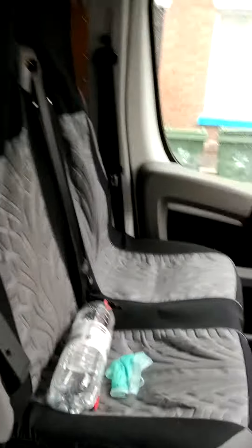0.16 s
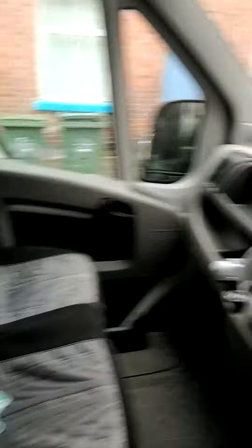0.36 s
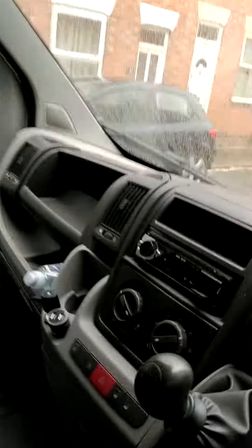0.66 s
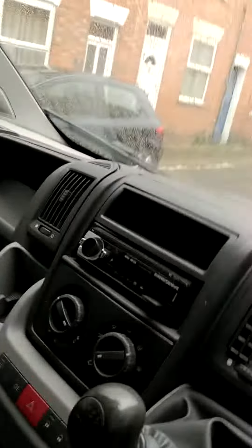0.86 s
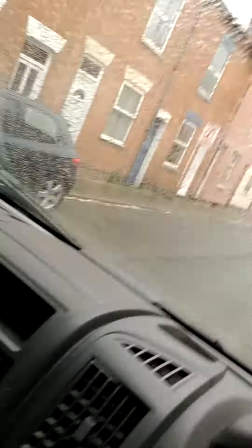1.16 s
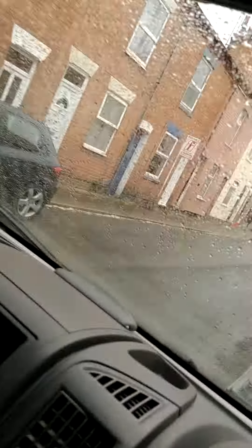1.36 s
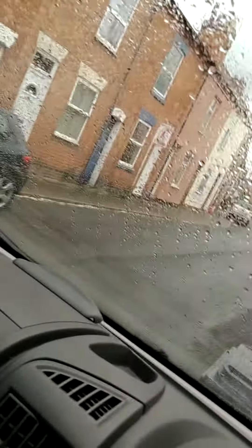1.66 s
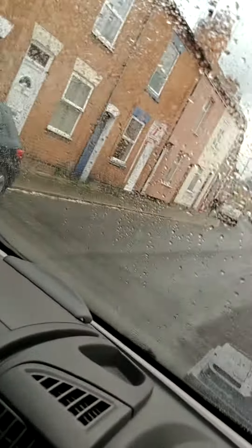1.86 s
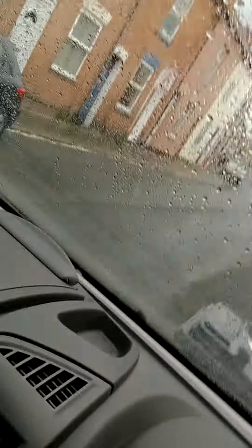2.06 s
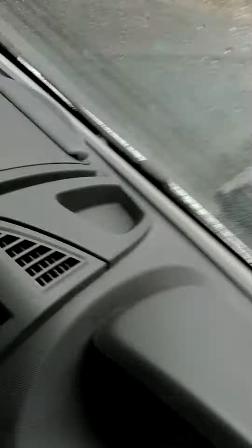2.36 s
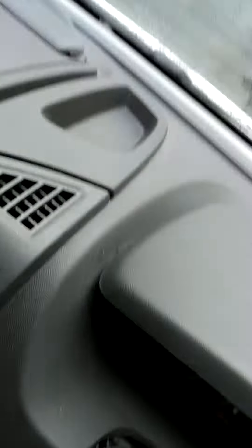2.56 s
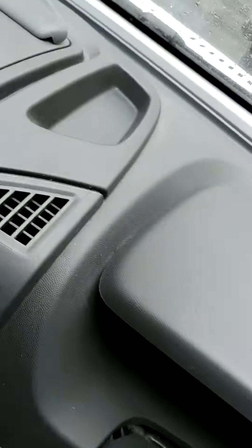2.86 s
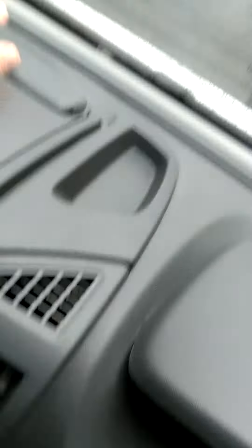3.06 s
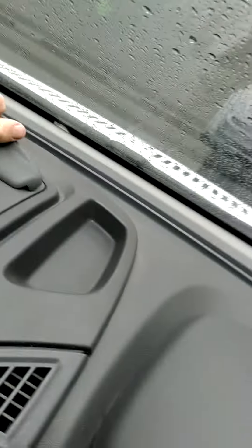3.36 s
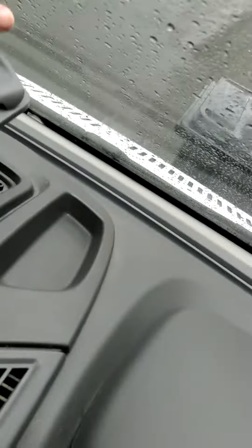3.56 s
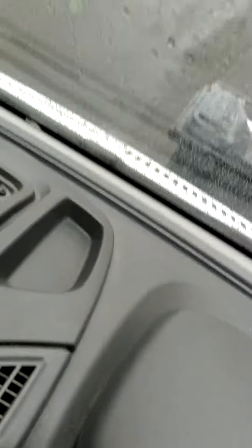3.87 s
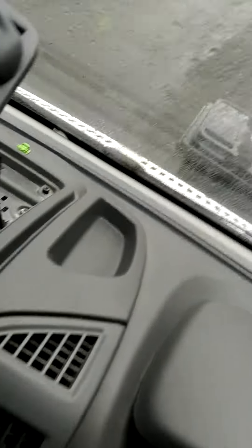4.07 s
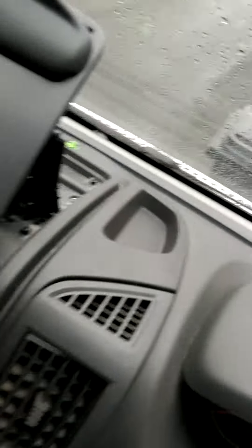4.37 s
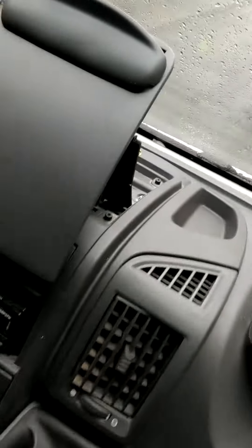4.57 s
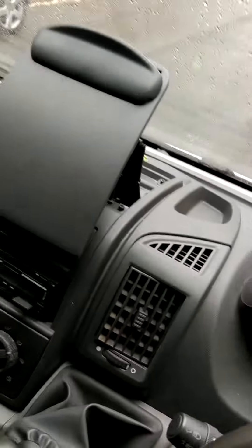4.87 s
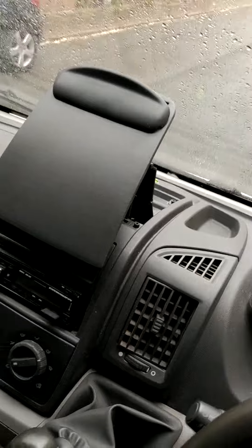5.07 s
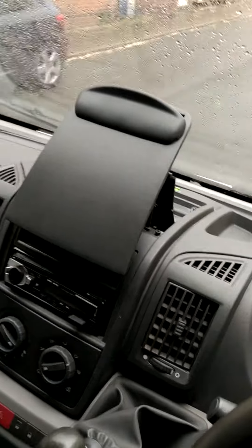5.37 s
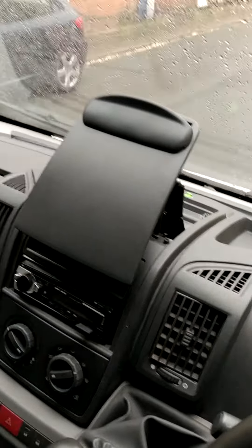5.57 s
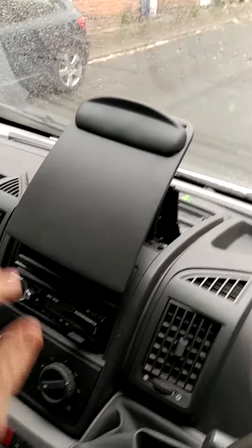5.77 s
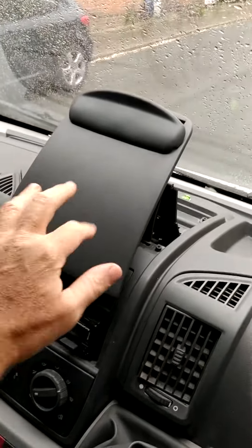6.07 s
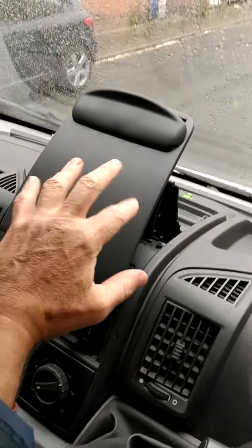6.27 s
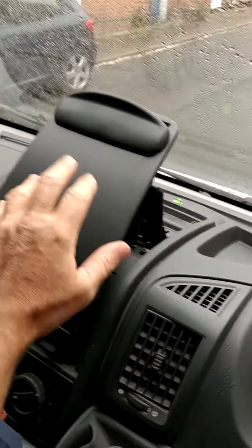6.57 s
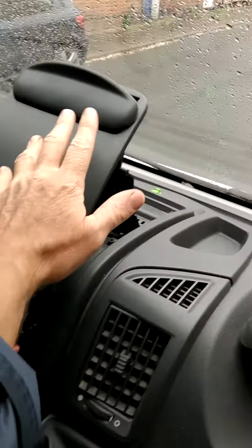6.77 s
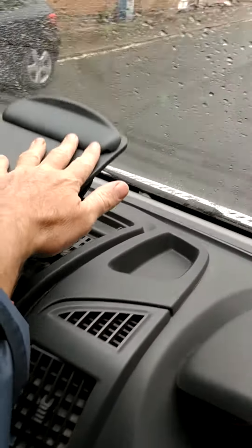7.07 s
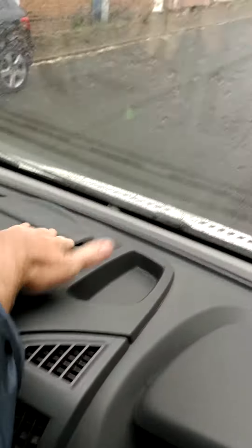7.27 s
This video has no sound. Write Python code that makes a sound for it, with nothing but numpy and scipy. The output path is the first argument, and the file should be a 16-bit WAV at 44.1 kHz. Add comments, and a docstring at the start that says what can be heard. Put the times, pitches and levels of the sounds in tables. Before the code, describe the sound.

Close, dry stereo inside a parked van, with very faint street rumble, hum and hiss. From the start a jacket swishes and rubs in uneven strokes, mostly left of centre, and the phone case makes tiny sharp ticks at one side or the other. At 0.8 s keys clash brightly with a soft thump, then clink lightly at 1.2 s. A faint rising squeak chirps near 1.9 s, a sharp tick follows at 2.0 s, and a dull dash thud lands at 2.55 s. From 2.8 s plastic scrapes; between 3.2 and 4.0 s a clipboard unlatches in a busy rattle of clacks and low knocks, strongest near 3.57 and 3.91 s. It calms to cloth rustle, with light finger taps around 5.8-6.0 s. Small clacks come at 6.9-7.0 s, a strong swish on the left at 7.25 s, then a loud booming plastic slap at 7.37 s.

```python
"""Clipboard and keys in a parked van.

Someone in a rustling jacket moves across the cab (shaped noise and small pats); keys clink (noise, modes).
A plastic clipboard is unlatched from the dashboard, swung up and slapped shut again (resonant noise bursts);
the dash booms under the blows (decaying sines and noise). Light taps, scrapes and a squeak go with it.
The hand-held phone ticks in the grip (short pulses), over faint hiss, hum and street rumble."""
import sys
import numpy as np
from scipy import signal
from scipy.fft import irfft
from scipy.io import wavfile
from scipy.ndimage import map_coordinates

SR = 44100
rng = np.random.default_rng(int(sys.argv[2]) if len(sys.argv) > 2 else 0)


def transcribe(signal):
    """Save signal, clipped to [-1, 1], as a 16-bit WAV file at the path in sys.argv[1]."""
    frames = np.atleast_2d(signal).T
    limited = np.clip(frames, -1, 1)
    pcm = np.round(limited * 32767).astype(np.int16)
    wavfile.write(sys.argv[1], SR, pcm)


N = 327222
TIME = np.arange(N) / SR
AGE = np.arange(SR // 3) / SR  # seconds since the start of one hit
LEFT_RIGHT = np.array([[1], [-1]])


def undb(db):
    """Decibels to gain."""
    return 10 ** (np.asarray(db) / 20)


def unit(x):
    """Scale to rms 1."""
    return x / np.sqrt(np.mean(x ** 2))


def fade(t60_s):
    """Exponential decay over the life of one hit, 60 dB in t60_s."""
    return np.exp(-np.log(1000) * AGE / max(t60_s, 1 / SR))


def sides(pan_db):
    """Left and right gains of equal total power; pan_db is left minus right."""
    return unit(undb(LEFT_RIGHT * pan_db / 2))


def add(out, start_s, sound):
    """Mix a sound in at start_s."""
    end = out.shape[1]
    i = int(np.clip(start_s * SR, 0, end - 1))
    out[:, i:i + sound.shape[1]] += sound[:, :end - i]


def shape(points, f):
    """Gain of a (Hz, dB) spectrum, interpolated over log frequency."""
    hz, db = np.transpose(points)
    return undb(np.interp(np.log(f + 1), np.log(hz), db))


def peaks(table, f):
    """Gain of resonances (Hz, width Hz, dB), added in power."""
    power = sum(undb(db) ** 2 / (1 + (2 * (f - hz) / width_hz) ** 2) for hz, width_hz, db in table)
    return np.sqrt(power)


def cab_noise(gain, size, alike_hz=560, lead_ms=0, direct=0):
    """Noise of colour gain(f) at two ports: long waves alike, short ones unrelated but for a direct share."""
    f = np.fft.rfftfreq(size, 1 / SR)
    mid, side = np.exp(2j * np.pi * rng.random((2, len(f))))
    alike = .95 / (1 + (f / alike_hz) ** 2)
    # the direct share reaches the left port first by lead_ms
    lead = np.exp(2j * np.pi * f * lead_ms / 1000)
    alike = alike + np.clip(direct, 0, 1) * (1 - alike) * lead
    mid = mid * np.sqrt(1 + abs(alike))
    side = side * np.sqrt(1 - abs(alike))
    both = (mid + LEFT_RIGHT * side) * np.exp(.5j * LEFT_RIGHT * np.angle(alike))
    return unit(irfft(gain(f) * both, size))


def flicker(rate_hz, size):
    """Random wander: normal draws at rate_hz joined by straight lines."""
    knots = np.arange(size) * rate_hz / SR
    return np.interp(knots, np.arange(size), rng.standard_normal(size))


def strike(t60_s, rise_s, cab_db, cab_t60_s):
    """Envelope of a blow: contact builds, the part rings, the upholstered cab holds a tail."""
    contact = 1 - np.exp(-(AGE / rise_s) ** 2)
    envelope = contact * np.hypot(fade(t60_s), undb(cab_db) * fade(cab_t60_s))
    return envelope / envelope.max()


def ripple(f, echo=0.19):
    """Windscreen and dash are close by: their echoes give each blow its own peaks and notches."""
    delays_s = rng.uniform(.0005, .004, (3, 2, 1))
    echoes = np.exp(-2j * np.pi * f * delays_s).sum(axis=0)
    return 1 + echo * f / (f + 1500) * echoes


def chatter(depth_db):
    """Uneven gain of loose parts that bounce and touch again; a slower wander joins after first contact."""
    fast = flicker(900, len(AGE))
    slow = flicker(220, len(AGE)) * AGE / (AGE + .012)
    return undb(depth_db * (fast + slow))


# Street noise spectrum. Each row: frequency in Hz, relative level in dB.
STREET_SPECTRUM = [(20, -7.5), (33, -34), (46, 6.5), (65, -8), (160, -11.5), (500, -15), (1500, -30),
                   (4500, -35), (8000, -20.5), (12000, -33)]
# Steady hum. Each row: frequency in Hz, mean rms level in dB.
HUM_TONES = [(47.7, -65.5), (168, -74), (481, -75.5)]
STREET_DB = -62


def street(swell_db=1):
    """Rumble, a low hum and faint hiss come through the closed cab: shaped noise and wavering sines."""
    hum = 0
    for hz, db in HUM_TONES:
        level = np.sqrt(2) * undb(db + 2 * flicker(1.97, N))
        hum = hum + level * np.sin(2 * np.pi * hz * TIME + 0.38 * flicker(7.7, N))
    noise = cab_noise(lambda f: shape(STREET_SPECTRUM, f), size=N)
    return hum + noise * undb(STREET_DB + swell_db * flicker(3.57, N))


STROKE_ATTACK_S, STROKE_REF_DB = 0.06, -37  # a stroke at the reference level takes this attack
STROKE_LAZINESS = 0.51  # fainter strokes gather speed more slowly
STROKE_RELEASE_DB_PER_S = 152
SETTLE_DB, SETTLE_DB_PER_S = -11, 54  # after a stroke the cloth keeps settling, faintly


def stroke(start_s, length_s, swish_db):
    """Gain of one movement: the cloth speeds up, slides, stops and settles."""
    age = TIME - start_s
    after = np.maximum(age - length_s, 0)
    attack_s = STROKE_ATTACK_S * undb(STROKE_LAZINESS * (STROKE_REF_DB - swish_db))
    attack = np.sin(np.pi / 2 * np.clip(age / attack_s, 0, 1)) ** 2
    release = undb(-STROKE_RELEASE_DB_PER_S * after)
    settling = undb(SETTLE_DB - SETTLE_DB_PER_S * after)
    return attack * np.maximum(release, settling)


# Strokes of arm and body in the jacket.
# Each row: start in seconds, length in seconds, relative swish in dB, relative dull rubbing in dB.
JACKET_STROKES = [(-.15, 0.27, -59.5, -54.5), (0.106, 0.38, -44.5, -55), (0.456, 0.28, -54, -55.5),
                  (0.727, 0.039, -37.5, -40), (0.825, 0.22, -47.5, -54.5), (0.986, 0.27, -41, -50.5),
                  (1.414, 0.38, -51.5, -58.5), (1.768, 0.23, -41, -52.5), (1.957, 0.45, -46.5, -50.5),
                  (2.402, 0.066, -47, -50.5), (2.606, 0.18, -45.5, -52), (2.794, 0.15, -43.5, -48),
                  (2.911, 0.34, -39.5, -46.5), (3.173, 0.24, -43.5, -40), (3.495, 0.14, -40.5, -42.5),
                  (3.598, 0.47, -50.5, -51), (4.052, 0.49, -44.5, -54), (4.395, 0.31, -43, -56.5),
                  (4.674, 0.3, -49.5, -58), (4.956, 1.02, -58, -58.5), (5.326, 0.24, -44.5, -55),
                  (5.487, 0.31, -50, -51), (5.765, 0.21, -41.5, -49.5), (6.553, 0.62, -55, -60),
                  (6.886, 0.094, -40, -43), (7.058, 0.37, -42, -49), (7.234, 0.25, -32.5, -44.5)]
RESTING_SWISH_DB, RESTING_RUB_DB = -68, -68  # cloth never lies quite still


def movement():
    """Gains of swish and rubbing: overlapping strokes add in power."""
    swish, rub = undb(RESTING_SWISH_DB) ** 2, undb(RESTING_RUB_DB) ** 2
    for start_s, length_s, swish_db, rub_db in JACKET_STROKES:
        power = stroke(start_s, length_s, swish_db) ** 2
        swish = swish + power * undb(swish_db) ** 2
        rub = rub + power * undb(rub_db) ** 2
    return np.sqrt(swish), np.sqrt(rub)


# Swish spectrum at the reference pitch. Each row: frequency in Hz, relative density in dB per Hz.
SWISH_SPECTRUM = [(1500, -16), (2500, -12), (4200, -11.5), (5600, -8.5), (7000, -2), (8200, 4),
                  (10000, -3.5), (12000, -8)]
# Centre of the swish over time. Each row: time in seconds, pitch in Hz.
SWISH_CENTRE = [(.13, 5920), (.21, 7390), (.47, 7530), (1.1, 8390), (5.2, 7960), (5.37, 7070), (5.5, 8000)]
SWISH_REF_HZ = 8200


def sliding_cloth():
    """The swish drifts in pitch over time: noise read at a varying rate."""
    weave = cab_noise(lambda f: shape(SWISH_SPECTRUM, f), size=N, lead_ms=.43, direct=0.34)
    rate = np.interp(TIME, *np.transpose(SWISH_CENTRE)) / SWISH_REF_HZ
    place = np.cumsum(rate)
    return np.array([map_coordinates(port, [place], mode="mirror") for port in weave])


def wandering_echoes(x, echo=0.92):
    """A moving arm changes its distance to the glass and the dash, so their short echoes slide about."""
    out = x.copy()
    index = np.arange(N)
    for channel in (0, 1):
        for delay_s in (.0014, .0027, .0041):
            delay = SR * delay_s * (1 + .07 * flicker(4, N))
            out[channel] += echo * np.interp(np.round(index - delay), index, x[channel])
    return unit(out)


def buckling_folds(folds_per_s):
    """Folds buckle in small pats: short sines of random pitch, size and phase offset on the right."""
    pats = np.zeros((2, N))
    for start, size, octave, turn in rng.random((int(folds_per_s * N / SR), 4)):
        # each pat rings for about four cycles, between 180 Hz and 1.3 kHz
        cycles = 180 * 7 ** octave * AGE[:SR // 30]
        phase = cycles + np.array([[0], [turn * octave]])
        pat = np.sin(2 * np.pi * phase) * cycles * np.exp(-cycles)
        add(pats, start * N / SR, size * np.sqrt(cycles[-1]) * pat)
    return unit(pats)


# Rubbing spectrum. Each row: frequency in Hz, relative level in dB.
RUB_SPECTRUM = [(30, -38), (80, 0.5), (170, 2), (300, 2.5), (550, -2.5), (1100, -1.5), (2000, -3.5),
                (3500, -7.5), (6000, -14)]
# Where the sleeve is; it ends close to the left port.
# Each row: time in seconds, left minus right in dB (the rubbing takes half).
SLEEVE_SIDE = [(0, 5), (2.3, 3.5), (2.9, 7), (3.45, 0.5), (4.5, 5), (6.9, 6), (7.3, 16)]


def jacket(swish_gain_db=1.5, rub_gain_db=-1.0, grain_db=1.45, crumple_db=2, folds_per_s=170, fold_db=-6):
    """Cloth slides on cloth with a fine-grained swish; its folds rub lower and buckle in small pats."""
    swishing, rubbing = movement()
    grain = undb(swish_gain_db + grain_db * flicker(300, N))
    swish = wandering_echoes(sliding_cloth()) * swishing * grain
    slide = cab_noise(lambda f: shape(RUB_SPECTRUM, f), size=N) * undb(crumple_db * flicker(70, N))
    folds = undb(fold_db) * buckling_folds(folds_per_s)
    rub = (slide + folds) * rubbing * undb(rub_gain_db)
    pan_db = np.interp(TIME, *np.transpose(SLEEVE_SIDE))
    pan = undb(LEFT_RIGHT * pan_db / 2)
    pan = pan / np.sqrt(np.mean(pan ** 2, axis=0))
    return swish * pan + rub * np.sqrt(pan)


# Snaps of the phone case in the grip.
# Each row: time in seconds, relative peak in dB, pitch in Hz, left minus right in dB.
CASE_TICKS = [(0.1725, -11, 960, 39), (0.2517, -14, 6640, -37), (.678, -24, 1800, 27),
              (1.1015, -7.5, 5540, 33), (1.9776, -1, 6200, 34), (3.3275, -11, 7040, 14),
              (3.5064, -5.5, 3450, 30), (4.284, -17, 7100, 15)]


def grip(shell_db=-20):
    """The case snaps beside one port: a single push and pull, a brief shell buzz, no room sound."""
    out = np.zeros((2, N))
    lead_s = 64 / SR  # room for the first half of the pulse
    for start_s, db, hz, pan_db in CASE_TICKS:
        u = 2 * np.pi * hz * (AGE - lead_s)
        snap = u * np.exp((1 - u ** 2) / 2)
        buzz = np.sin(u * 2 / 3) * (u > 0) * fade(0.0027)
        gains = sides(pan_db) / sides(pan_db).max()
        add(out, start_s - lead_s, (snap + undb(shell_db) * buzz) * undb(db) * gains)
    return out


# Keys that swing free. Each row: frequency in Hz before detuning, mean relative level in dB.
FREE_KEY_MODES = [(4870, 0), (5080, -6.5), (5450, -8), (5700, -9), (6550, -2.5), (6900, -10), (7590, -4),
                  (8600, -5), (10230, -13), (11600, -24)]
KEY_T60_S = 0.075


def key_ring(scatter_db=4, detune=0.0087):
    """Decaying sines of free keys; every touch favours other modes, and each port hears them differently."""
    ring = 0
    for hz, db in FREE_KEY_MODES:
        hz = hz * (1 + detune * rng.standard_normal())
        level = undb(db + scatter_db * rng.standard_normal((2, 1)))
        ring = ring + level * np.sin(2 * np.pi * hz * AGE + np.pi * rng.random((2, 1)))
    return ring * fade(KEY_T60_S) * chatter(2) * np.minimum(AGE / .001, 1) / 2


# Hard plastic contact spectrum. Each row: frequency in Hz, relative level in dB.
PLASTIC_SPECTRUM = [(150, -12), (500, -3), (1000, -3), (2000, -2), (3500, -1), (5000, -1), (6000, -4),
                    (8500, 1), (9500, 0), (10500, -4.5), (12000, -7)]


def plastic_contact(f):
    """Colour of a hard contact, shared by key clicks and clipboard clacks."""
    return shape(PLASTIC_SPECTRUM, f)


# Keys touching. Each row: time in seconds, relative level in dB, left minus right in dB,
# clash t60 in seconds, free ring in dB relative to the clash gain.
KEY_CLINKS = [(0.749, -25, 2, 0.027, 1), (0.771, -35, 4, 0.04, 0), (.796, -16, 2, 0.034, -7),
              (0.8007, 1, 0.5, 0.024, -13), (0.8377, -27, 6, 0.017, -1), (0.8752, -30.5, 8, 0.016, 3.5),
              (1.214, -14.5, 5, 0.02, -4), (1.224, -23, 2, 0.036, 2.5), (2.675, -28, 6, 0.053, 0.5),
              (3.1238, -20.5, -1, 0.096, -26), (3.166, -17.5, 20, 0.021, -21)]
# Keys damped in the bunch. Each row: frequency in Hz, width in Hz, relative level in dB.
BUNCH_RESONANCES = [(4900, 350, -15), (5760, 810, -11), (7910, 360, 0), (8840, 660, -3.5), (11500, 670, -9)]


def keys(gain_db=-11, jostle_db=1.5, contact_db=-22):
    """Keys in a bunch: a contact click, a bright damped clash, the clear ring of a key that swings free."""
    def colour(f):
        bright = peaks(BUNCH_RESONANCES, f) * f ** 4 / (f ** 4 + 3800 ** 4)
        return (bright + undb(contact_db) * plastic_contact(f)) * ripple(f)

    out = np.zeros((2, N))
    for start_s, db, pan_db, t60_s, ring_db in KEY_CLINKS:
        envelope = strike(t60_s, rise_s=.0005, cab_db=-20, cab_t60_s=.13) * chatter(jostle_db)
        clash = cab_noise(colour, size=len(AGE), lead_ms=.43, direct=0.76) * envelope
        clink = clash + undb(ring_db) * key_ring()
        add(out, start_s, clink * undb(db + gain_db) * sides(pan_db))
    return out


# Soft blows on dash, seat and floor.
# Each row: time in seconds, relative level in dB, pitch in Hz, hollow knock in dB relative to the blow.
SOFT_BLOWS = [(0.783, -16.5, 107, -30), (0.83, -29.5, 35, -37), (1.086, -23.5, 166, -15),
              (1.676, -36.5, 271.6, -8.5), (1.695, -34.5, 260, -24), (2.224, -34, 320, -39),
              (2.553, -9.5, 133, -17.5), (2.571, -27, 240, -32), (2.705, -31, 250, -40),
              (3.239, -30.5, 79.6, -25), (3.245, -25.5, 302, -29), (3.467, -24.5, 438, -18),
              (3.565, -13.5, 183, -21), (3.667, -13.5, 273.5, -29), (3.683, -24, 208, -19),
              (3.916, -9.5, 183, -17.5), (3.943, -15.5, 216, -26), (4.759, -41, 200, -17),
              (4.988, -35.5, 263, -23), (5.128, -45, 194, -24), (5.914, -29, 255.5, -25.5),
              (6.929, -29, 287, -30), (7.372, -11, 212.3, -8.5), (7.403, -10, 173, -18),
              (7.412, -5.5, 195, -14)]
# Dashboard modes. Each row: frequency in Hz, relative level in dB, t60 in seconds.
DASH_MODES = [(79, 6.5, 0.098), (139, -7.5, 0.37), (175.2, -3, 0.27), (216, -2, 0.21), (270.8, 2.5, 0.17),
              (334.7, 3, 0.15), (423, -16, 0.13), (521, 1.5, 0.14), (660, -19, 0.045)]
# ring time at the reference pitch; it falls as pitch to the power of the damping
PANEL_T60_S, PANEL_REF_HZ, PANEL_DAMPING = 0.063, 184, 0.71
PANEL_LEAK = 0.27  # below this share of its pitch, air slips round a panel and little sound leaves it


def dashboard(gain_db=0, modes_db=-13, boom_db=-15, octaves=0.83, hollow_hz=510, hollow_width_hz=300,
              push_s=0.0072):
    """Each blow flexes a panel at its own pitch, wakes dash modes near it and knocks in the hollow behind."""
    def hollow(f):
        return peaks([(hollow_hz, hollow_width_hz, 0)], f) ** 2

    out = np.zeros((2, N))
    lag_s = LEFT_RIGHT * .00016
    for start_s, db, hz, knock_db in SOFT_BLOWS:
        def near(f):
            return 1 / (1 + (np.log2((f + 1) / hz) / octaves) ** 2 * (1 + (f / 900) ** 2))

        t60_s = PANEL_T60_S * (PANEL_REF_HZ / hz) ** PANEL_DAMPING
        flex = np.sin(2 * np.pi * hz * AGE) * fade(t60_s)
        ring = 0
        for k, (mode_hz, mode_db, mode_t60_s) in enumerate(DASH_MODES):
            # modes lie to alternate sides, so they reach one port before the other
            phase = 2 * np.pi * mode_hz * (AGE + (-1) ** k * lag_s) + np.pi * k
            ring = ring + near(mode_hz) * undb(mode_db) * np.cos(phase) * fade(mode_t60_s)
        boom = cab_noise(near, size=len(AGE))
        boom = boom * strike(t60_s, rise_s=0.004, cab_db=-2.0, cab_t60_s=0.25)
        knock = cab_noise(hollow, size=len(AGE))
        knock = knock * strike(t60_s, rise_s=0.00055, cab_db=18, cab_t60_s=0.16)
        blow = (flex + undb(modes_db) * ring) * (1 - np.exp(-AGE / push_s))
        blow = blow + undb(boom_db) * boom + undb(knock_db) * knock
        leak = signal.butter(2, PANEL_LEAK * hz, "high", fs=SR, output="sos")
        add(out, start_s, signal.sosfilt(leak, blow) * undb(db + gain_db))
    return out


# Plastic parts striking.
# Each row: time in seconds, relative level in dB, lift of the middle in dB, t60 in seconds.
PLASTIC_CLACKS = [(1.089,-26,-18,0.1), (1.3224,-36,-3,0.063), (1.343,-37,-5,0.15), (2.561,-33,-11.5,0.18),
                  (3.235,-17,-5.5,0.055), (3.299,-21,-7.5,0.028), (3.372,-31.5,-9,0.071),
                  (3.401,-24.5,-16,0.11), (3.426,-18.5,1,0.056), (3.467,-28,-3,0.06), (3.525,-23,-11,0.09),
                  (3.537,-25,10,0.044), (3.557,-19.5,-7,0.05), (3.5653,-15,-3.5,0.068),
                  (3.6937,-20.5,-4,0.039), (3.908,-24,12,0.089), (3.913,-10,-2.5,0.059),
                  (3.9207,-19.5,1,0.23), (3.965,-27.5,-4,0.13), (3.98,-22,-4,0.064),
                  (4.1495,-29.5,-1,0.049), (6.932,-28.5,2,0.082), (7.0042,-20.5,-9.5,0.05),
                  (7.362,-17,-3,0.16), (7.3693,-5.5,-11,0.11), (7.379,-11,-7,0.065), (7.391,-16.5,0,0.3)]
# Clipboard resonances. Each row: frequency in Hz, width in Hz, relative level in dB.
BOARD_RESONANCES = [(1970, 140, -2), (2600, 130, -2), (2880, 130, -3), (3790, 130, -4), (4400, 140, -4),
                    (5280, 160, -5), (7500, 250, -2), (8450, 350, -4)]


def clipboard(gain_db=-2, ring_db=4, chatter_db=2):
    """Loose plastic parts chatter and ring the board; each clack has its own fuller or thinner middle."""
    out = np.zeros((2, N))
    for start_s, db, middle_db, t60_s in PLASTIC_CLACKS:
        def colour(f):
            board = 1 + undb(ring_db) * peaks(BOARD_RESONANCES, f)
            middle = undb(middle_db * peaks([(2200, 7600, 0.012)], f) ** 2)
            return plastic_contact(f) * board * middle * ripple(f)

        envelope = strike(t60_s, rise_s=.002, cab_db=-15, cab_t60_s=.14) * chatter(chatter_db)
        clack = cab_noise(colour, size=len(AGE), lead_ms=-.4, direct=0.083) * envelope
        add(out, start_s, clack * undb(db + gain_db))
    return out


# Fingers and loose fittings tapping.
# Each row: time in seconds, relative level in dB, pitch in Hz, width in Hz, t60 in seconds.
LIGHT_TAPS = [(1.108, -21.5, 1300, 1900, 0.014), (1.344, -33.5, 440, 915, 0.15),
              (2.557, -34, 1300, 2670, 0.16), (2.707, -22.5, 254, 196, 0.046),
              (2.85, -36, 900, 1300, 0.034), (3.058, -33, 895, 600, 0.027), (3.111, -31.5, 895, 400, 0.053),
              (3.167, -26, 1060, 2000, 0.035), (3.525, -25.5, 490, 504, 0.048),
              (3.566, -23, 595, 600, 0.041), (4.008, -22.5, 1850, 950, 0.064),
              (4.15, -33.5, 984, 800, 0.097), (5.775, -26.5, 715, 944, 0.031),
              (5.830, -25.5, 2314, 2200, 0.011), (5.887, -30, 1500, 2600, 0.011),
              (5.967, -29.5, 720, 600, 0.014), (6.011, -27.5, 831, 1000, 0.019),
              (6.808, -29, 2160, 850, 0.015)]


def taps(gain_db=-6):
    """Light taps ring one broad resonance each; the lower the tap, the softer its contact."""
    out = np.zeros((2, N))
    for start_s, db, hz, width_hz, t60_s in LIGHT_TAPS:
        ring = cab_noise(lambda f: peaks([(hz, width_hz, 0)], f) ** 2, size=len(AGE))
        envelope = strike(t60_s, rise_s=.6 / hz, cab_db=-22, cab_t60_s=.1)
        # every draw gets the energy of its envelope
        tap = unit(ring * envelope) * np.sqrt(np.mean(envelope ** 2))
        add(out, start_s, tap * undb(db + gain_db) * sides(pan_db=3.5))
    return out


# A rubbing squeak. Each row: time in seconds, mean pitch in Hz, mean level in dB.
SQUEAK_PATH = [(1.849, 1374, -61), (1.874, 1446, -49), (1.912, 1864, -53), (1.935, 1860, -83)]


def squeak(jitter=0.0514, rough_db=3):
    """A surface sticks and slips faster as it is pulled along: a faint, rough rising chirp."""
    s, hz, db = np.transpose(SQUEAK_PATH)
    pitch_hz = np.interp(TIME, s, hz) * (1 + jitter * flicker(700, N))
    level = undb(np.interp(TIME, s, db) + rough_db * flicker(330, N))
    sounding = (TIME > s[0]) * (TIME < s[-1])
    return np.sin(2 * np.pi * np.cumsum(pitch_hz) / SR) * level * sounding


# Plastic and fingers dragging. Each row: start in seconds, length in seconds, rms level in dB.
DRAGS = [(2.837, 0.35, -56.5), (3.189, 0.24, -46), (3.526, 0.19, -51)]
SLIPS_PER_S, SLIP_SPREAD_DB = 190, 20
SLIP_LOW_HZ, SLIP_OCTAVES, SLIP_CYCLES = 700, 2.5, 0.86


def scrapes():
    """Dragging surfaces catch and let go unevenly; each slip is a tiny knock of its own pitch and size."""
    out = np.zeros((2, N))
    for start_s, length_s, db in DRAGS:
        slips = np.zeros((2, int(length_s * SR)))
        for when, size, octave, turn in rng.random((int(SLIPS_PER_S * length_s), 4)):
            cycles = SLIP_LOW_HZ * 2 ** (SLIP_OCTAVES * octave) * AGE[:SR // 60]
            phase = cycles + np.array([[0], [turn * octave]])
            slip = np.sin(2 * np.pi * phase) * np.exp(-cycles / SLIP_CYCLES)
            add(slips, when * length_s, slip * undb(SLIP_SPREAD_DB * size ** 2))
        add(out, start_s, unit(slips) * undb(db))
    return out


def scene():
    """Everything heard in the cab."""
    background = street() + jacket() + grip()
    blows = keys() + dashboard() + clipboard() + taps()
    return background + blows + squeak() + scrapes()


SHELF_HZ, SHELF_DB, CUT_HZ = 11950, -22, 16000


def record(dry):
    """Treble falls off above a shelf, the loudest peaks are rounded and the very top is cut."""
    shelf = signal.ellip(8, .2, 45, SHELF_HZ, fs=SR, output="sos")
    shelved = signal.sosfilt(shelf, dry) + undb(SHELF_DB) * dry
    rounded = .9 * np.tanh(shelved / .9)
    cut = signal.ellip(10, .2, 80, CUT_HZ, fs=SR, output="sos")
    return signal.sosfilt(cut, rounded)


dry = scene()
out = record(dry)
transcribe(out)
```